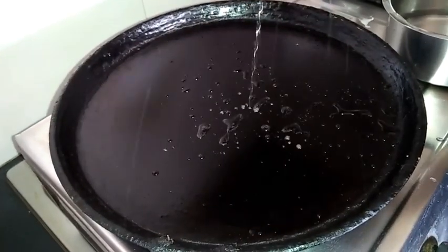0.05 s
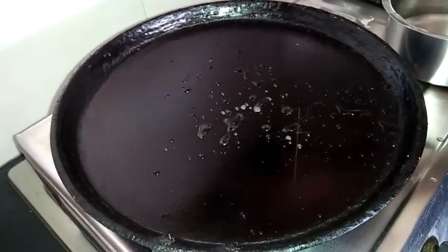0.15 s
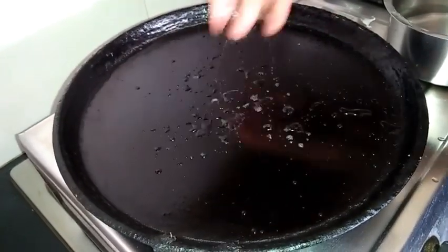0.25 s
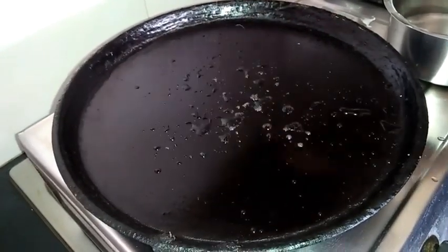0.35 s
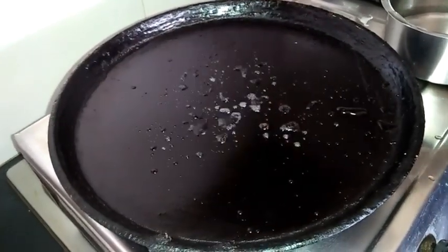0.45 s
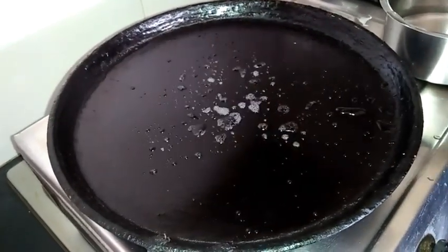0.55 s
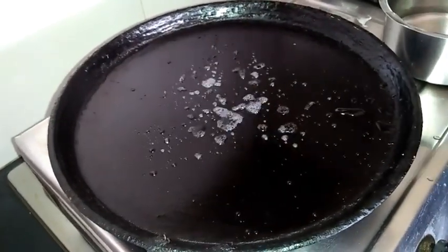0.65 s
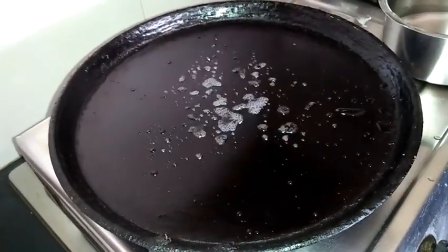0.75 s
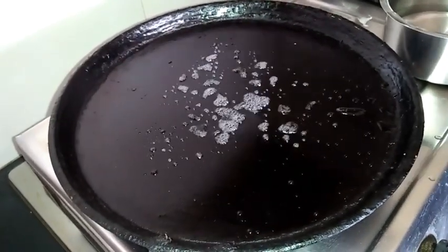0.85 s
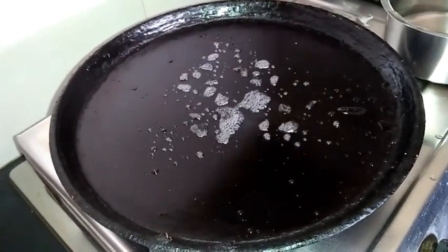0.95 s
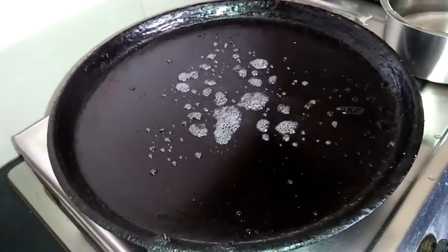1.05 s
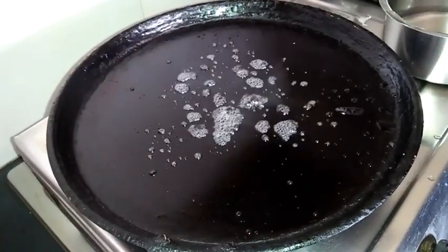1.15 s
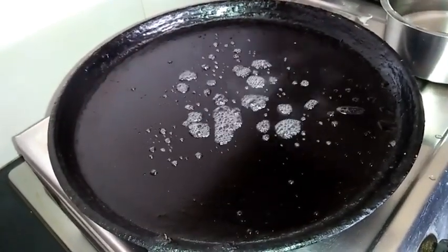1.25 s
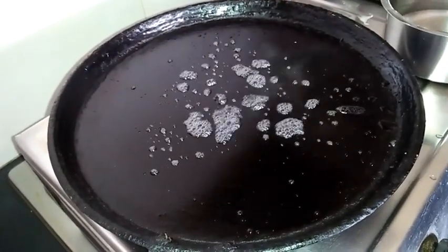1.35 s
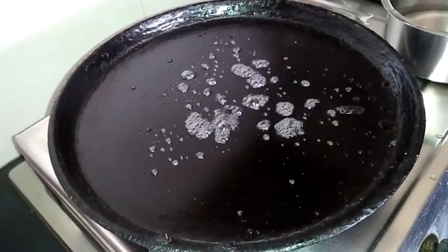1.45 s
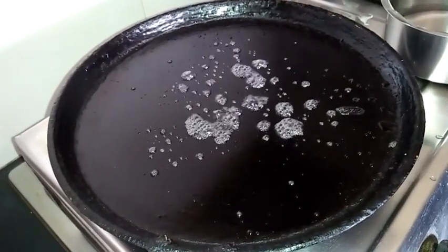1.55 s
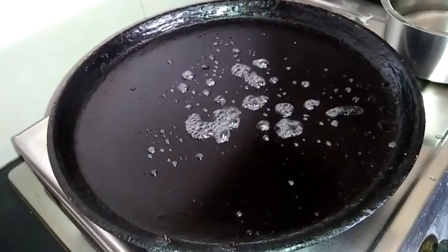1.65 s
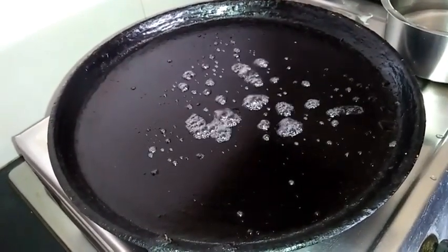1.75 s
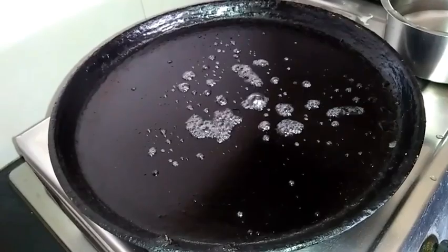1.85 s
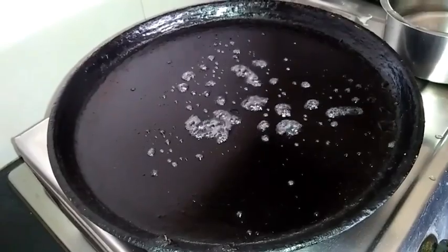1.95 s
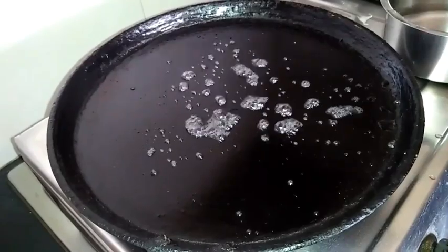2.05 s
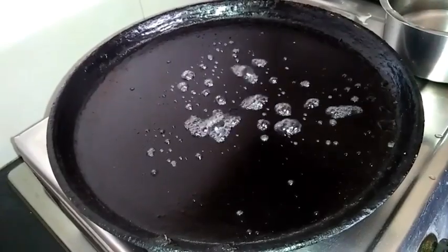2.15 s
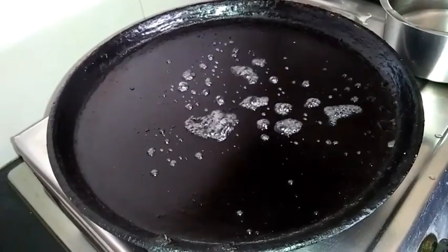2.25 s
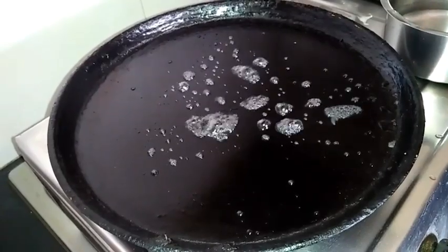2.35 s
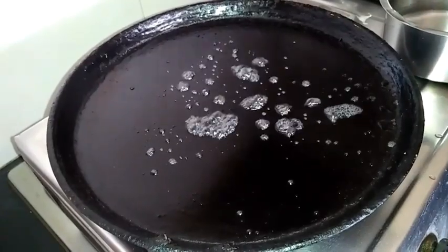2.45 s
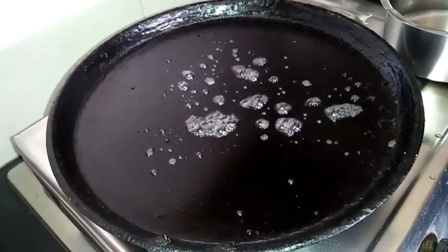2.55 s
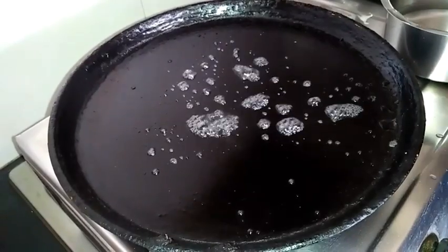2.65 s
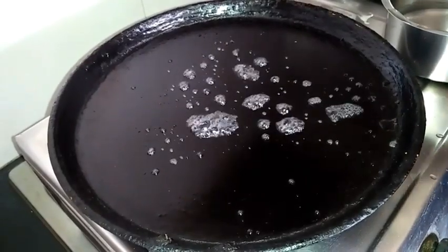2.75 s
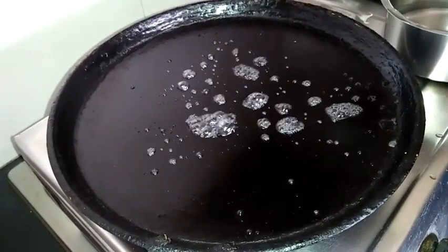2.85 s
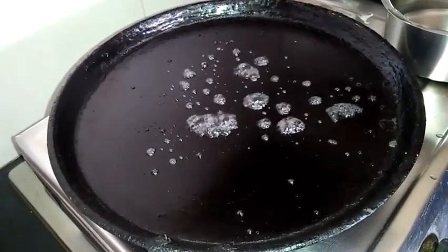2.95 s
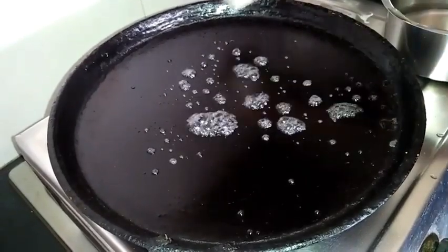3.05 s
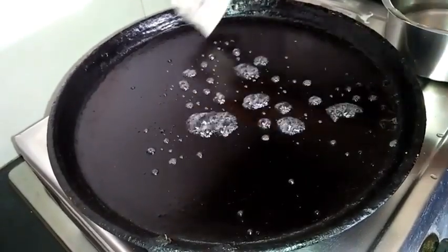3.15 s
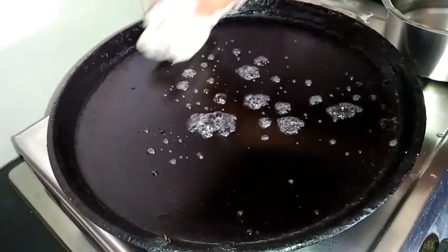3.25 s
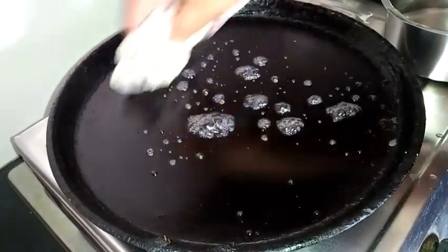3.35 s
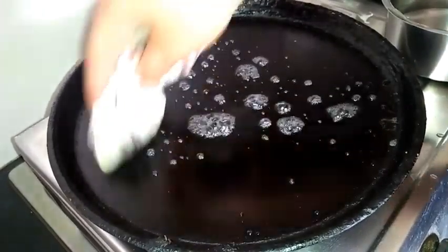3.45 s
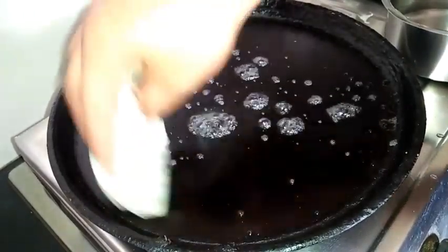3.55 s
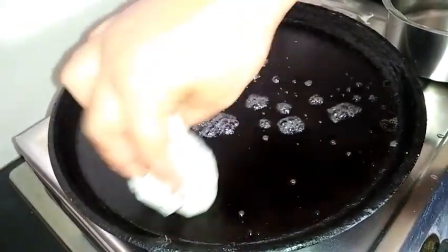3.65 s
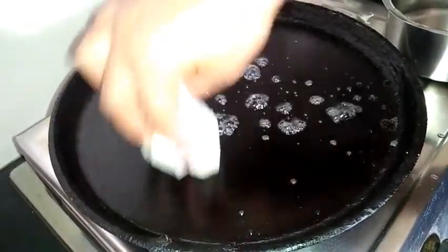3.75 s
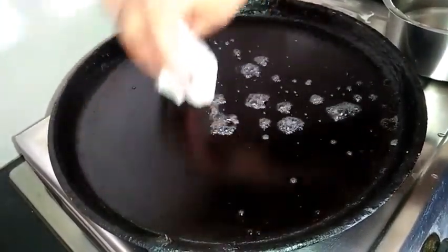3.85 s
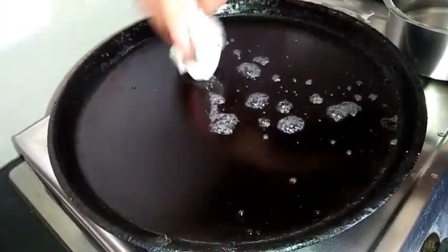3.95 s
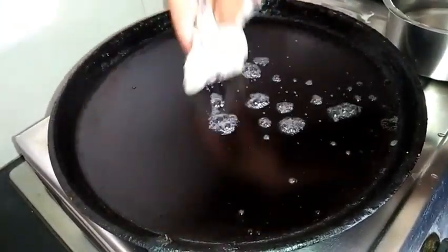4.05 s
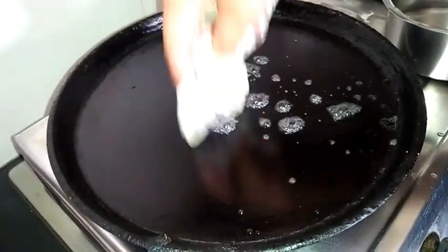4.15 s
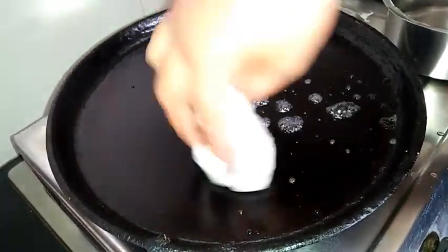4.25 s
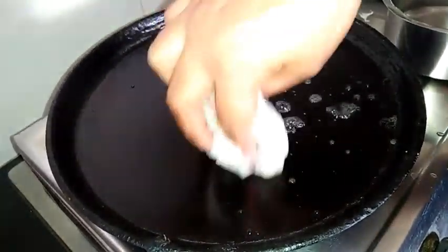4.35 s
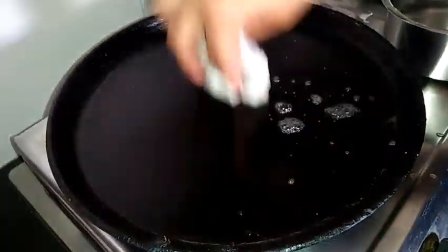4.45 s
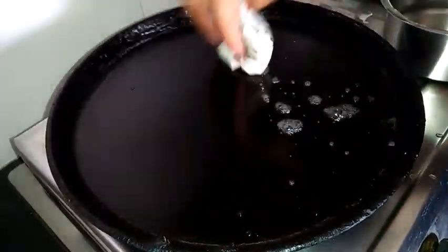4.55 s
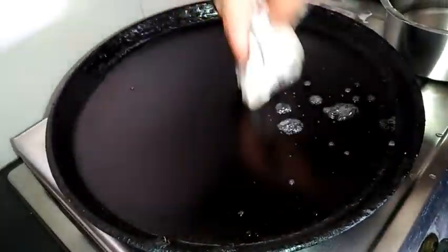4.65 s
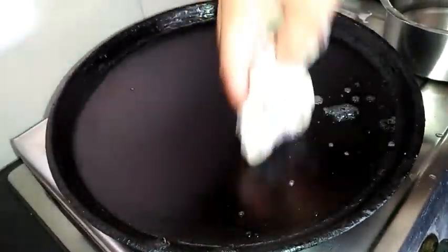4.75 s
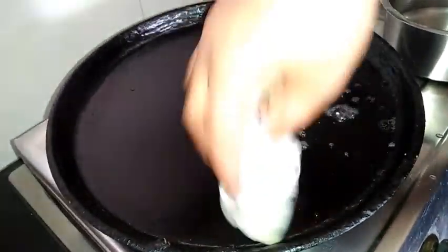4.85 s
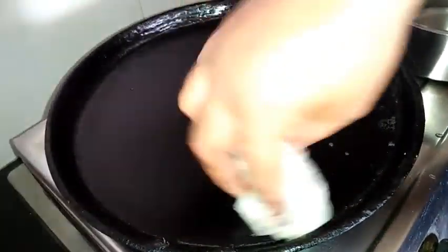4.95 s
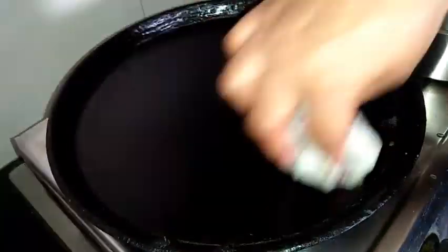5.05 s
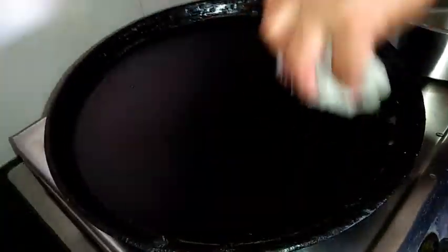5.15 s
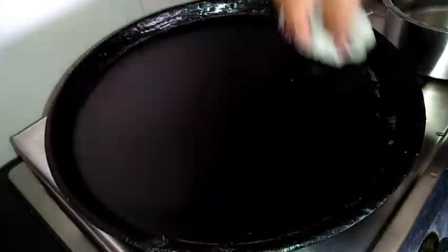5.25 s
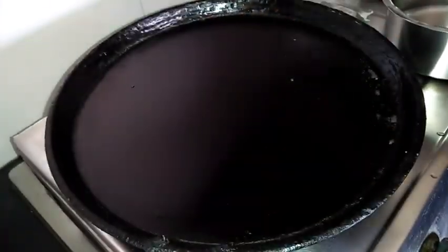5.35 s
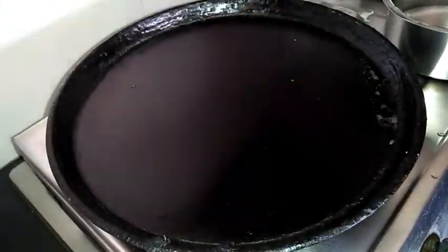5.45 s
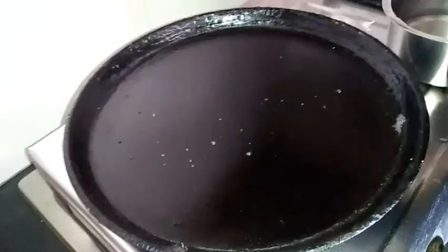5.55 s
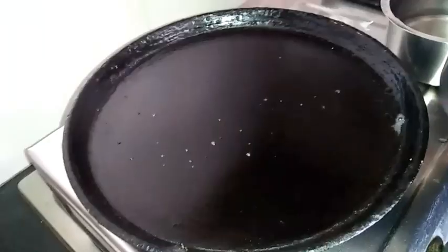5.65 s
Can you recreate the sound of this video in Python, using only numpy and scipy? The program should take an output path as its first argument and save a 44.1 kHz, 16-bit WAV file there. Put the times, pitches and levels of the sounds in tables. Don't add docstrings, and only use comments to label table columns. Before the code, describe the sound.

Bright, grainy sizzle with sharp tiny pops swells over a softly ringing iron plate, with one small metallic ping early on. After a lull, dull damp cloth blows land and the boiling surges into strong hissing bursts, loudest near the end, then stops abruptly. Close microphone, little room, faint flame rumble and hiss below; centred sound with slightly wide treble.

```python
import sys
import numpy as np
from scipy import signal
from scipy.fft import rfft, irfft
from scipy.io import wavfile
from scipy.ndimage import uniform_filter1d

SR = 44100
rng = np.random.default_rng(int(sys.argv[2]) if len(sys.argv) > 2 else 0)


def generate_wav(sig):
    pcm = np.round(np.clip(np.atleast_2d(sig).T, -1, 1) * 32767).astype(np.int16)
    wavfile.write(sys.argv[1], SR, pcm)


def gain_from_db(level_db):
    decades = np.asarray(level_db, float) / 20
    return 10 ** decades


N = 251186
TIME = np.arange(N) / SR

# frequency in Hz, density in dB per Hz.
IRON_SPECTRUM = [(260, -50.5), (450, -26.5), (647, -16.5), (720, -9), (930, -1), (1620, -0.5), (2060, 2),
                 (3310, -4), (3620, -3), (4390, -4), (5000, -8), (6500, -62.5), (11000, -120)]
# frequency in Hz, level in dB, t60 in seconds.
PLATE_MODES = [(560, -0.5, 0.33), (664.3, 3, 0.55), (630, -5, 0.353), (903, -8.5, 0.8), (957, -2, 0.31),
               (1025, -3, 0.28), (1121, 0.5, 0.16), (1255, 2, 0.31), (1534, -6.5, 0.26), (1702, -5, 0.3),
               (1802, 3, 0.28), (2030, -10.5, 0.18), (2137, 2.5, 0.3), (2390, 3.5, 0.06), (2600, -23, .15),
               (3040, 2, 0.34)]
# frequency in Hz, level in dB, t60 in seconds.
POT_MODES = [
    [(2110, 0, .16), (2160, -9, .1), (1710, -9, .12), (1120, -20, .15), (3020, -10, .3), (3348, -11, .15),
     (4300, -11, .1), (2400, -14, .1), (960, -12, .12)],
    [(1696, 2, .58), (1260, -16, .4), (3898, -28, .12), (3030, -24, .2)],
]


def unit(x):
    return x / np.sqrt(np.mean(x ** 2))


def colour(x, points):
    hz, db = np.transpose(points)
    f = np.maximum(np.fft.rfftfreq(8192, 1 / SR), 1)
    response_db = np.interp(np.log(f), np.log(hz), db, db[0] - 30, db[-1] - 30)
    cepstrum = irfft(np.log(gain_from_db(response_db)))
    cepstrum[1:4096] *= 2
    cepstrum[4097:] = 0
    impulse = irfft(np.exp(rfft(cepstrum)))[:4096]
    return signal.fftconvolve(x, impulse)[:len(x)]


def noise_of(points):
    return unit(colour(rng.standard_normal(N), points))


def walk(rate):
    k = int(SR / rate)
    held = np.repeat(rng.standard_normal(N // k + 1), k)
    return 0.91 * uniform_filter1d(uniform_filter1d(held, k), k)[:N]


def ring(x, modes, stretch=1):
    out = 0
    for hz, db, t60 in modes:
        pole = np.exp(2j * np.pi * hz / SR - np.log(1000) / (t60 * stretch * SR))
        out = out + gain_from_db(db) * signal.lfilter([1], [1, -pole], x).imag
    return out


def boiling():
    # time in seconds, steam in dB, grip on the iron in dB, bead size in dB.
    beads = [(0, -73, -5.5, -9), (.25, -65.5, -7, -6.5), (.55, -61, -9.5, -10.5), (.7, -57.5, -6.5, -11),
             (.88, -53, -8, -7.5), (1.1, -52, -10, -9), (1.28, -50, -8, -8), (1.53, -49, -11.5, -7.5),
             (1.66, -52, -11.5, -6), (1.85, -54.5, -6.5, -10), (1.97, -51.5, -11, -8.5),
             (2.08, -63, -6, -3.5), (2.16, -61.5, -4.5, -10), (2.36, -58, -6.5, -10.5),
             (2.55, -56, -10, -14.5), (2.96, -59, -7.5, -9), (3.05, -57, -9.5, -12.5),
             (3.4, -54, -6.5, -17.5)]
    # time in seconds, steam in dB, grip on the iron in dB, bead size in dB.
    wipes = [
        [(3.44, -51, -8, -16), (3.5, -47.5, -10, -14.5), (3.74, -47, -9.5, -8.5), (3.86, -45, -10, -10),
         (3.9, -44, -4.5, -11.5), (4.02, -38, -8.5, -21), (4.12, -42, -10.5, -37)],
        [(4.16, -38.5, -7, -14), (4.3, -45.5, 0, -4.5), (4.42, -39.5, -2.5, -11), (4.45, -38.5, -5, -11),
         (4.52, -41, -2, -13), (4.6, -44.5, -2.5, -12), (4.7, -40.5, -7.5, -21)],
        [(4.75, -37.5, -9.5, -25), (4.79, -33, -14, -20), (4.9, -33.5, -13, -17), (4.99, -36.5, -11.5, -17),
         (5.07, -46, -3, -14), (5.13, -39, -11.5, -11.5), (5.27, -40, -8, -14.5), (5.35, -46.5, -10.5, -13.5),
         (5.41, -60.5, -12, -13.5)],
    ]
    # time in seconds, level in dB.
    squeezed = [(.3, -9), (1.3, -13.5), (3.3, -17), (3.5, -10), (4.1, -10), (4.55, -6), (4.72, -7.5),
                (4.88, -14), (5.1, -4.5), (5.4, -2.5)]
    # start in seconds, height in dB, rise in seconds, fade in seconds,
    # share in the spray from 0 to 1.
    surges = [(.043, 4, .004, 0.068, .6), (.292, 5.5, .005, 0.14, 1), (.59, 6, 0.0079, 0.035, 1),
              (.727, 3.5, .005, 0.034, 1), (.77, 4, .008, .012, .3), (.968, 4, .008, .015, .5),
              (1.028, 5, .008, .015, 1), (1.16, 4, .008, .015, .7), (1.7, 7, 0.0091, 0.033, .5),
              (1.77, 5, .004, 0.045, .8), (1.87, 4, .004, 0.015, .5), (1.903, 2, .004, 0.03, .5),
              (2.163, 8, 0.0054, 0.069, .4), (2.195, 6.5, .02, 0.046, .6), (2.375, 6, .015, .08, .4),
              (2.43, 4, .01, 0.033, .4), (2.586, 3.5, 0.005, 0.078, .5), (2.7, 3, .012, .03, .6),
              (3.08, 5, .012, 0.088, .4), (4.145, 5.5, .03, .055, 1), (4.32, 6, 0.029, 0.081, 0.2),
              (4.534, 11, 0.002, 0.013, 1), (4.766, 3.5, 0.00395, 0.064, .6), (4.905, 1, .005, .04, .8),
              (5.662, 6, .003, .015, .3)]
    # small bubbles, spray, iron and large bubbles, all in dB.
    again_db = [-68, -75, -70, -79]
    change_s, surge_in_iron = 5.631, 0.17
    dry_db_per_s, iron_dry_db_per_s = -370, -210

    s, *columns = np.transpose(sum(wipes, beads))
    steam, grip, size = (np.interp(TIME, s, c) for c in columns)
    spray = np.interp(TIME, *np.transpose(squeezed))
    dry_s = np.maximum(TIME - s[-1], 0)
    wet = steam + dry_db_per_s * dry_s
    iron = np.maximum(steam + grip + iron_dry_db_per_s * dry_s, -90)
    spray_floor = -72 + dry_db_per_s * dry_s
    fine = 10 * np.log10(gain_from_db(wet + spray) ** 2 + gain_from_db(spray_floor) ** 2)
    levels = np.where(TIME < change_s, [wet, fine, iron, wet + size], np.array(again_db)[:, None])
    for at, db, rise, fade, bright in surges:
        growth = np.clip((TIME - at) / rise, 0, 1)
        flare = db * growth * np.exp(-np.maximum(TIME - at - rise, 0) / fade)
        levels = levels + flare * np.array([[1], [bright], [surge_in_iron], [1]])
    return levels


def bubbles(low_hz, octaves, rate, spread_db, flicker_db, steam_db, cycles, own_db):
    fits = gain_from_db(flicker_db * (walk(30) + walk(110)))
    out = 0
    for hz in low_hz * 2 ** np.arange(0, octaves, 1 / 6):
        size_db = spread_db * np.minimum(rng.exponential(size=N), 3.6)
        burst = (rng.random(N) < rate / SR) * gain_from_db(size_db) * rng.choice([-1, 1], N)
        drive = unit(burst) + gain_from_db(steam_db) * rng.standard_normal(N)
        band = unit(ring(drive, [(hz, 0, cycles / hz)])) * np.sqrt(hz)
        out = out + band * gain_from_db(own_db * (0.59 * walk(9) + 1.15 * walk(38)))
    return fits * out


def fizz(small_db, spray_db, large_db):
    # frequency in Hz, density in dB per Hz.
    large_spectrum = [(2530, -30.5), (4300, -20.5), (5620, -12.5), (7300, -4), (9490, -17.5), (16100, -120)]
    # frequency in Hz, density in dB per Hz.
    small_spectrum = [(4290, -35.5), (7300, -8), (7940, 0.5), (8950, 4.5), (12000, -5.5), (15000, -57),
                      (22000, -120)]
    # frequency in Hz, density in dB per Hz.
    spray_spectrum = [(6760, -31), (11500, -5.5), (12500, 3.5), (13700, 5.5), (14200, 4.5)]
    boil = bubbles(4000, 2, rate=400, spread_db=3.2, flicker_db=.8, steam_db=-.5, cycles=30, own_db=3.4)
    large = unit(colour(boil, large_spectrum)) * gain_from_db(large_db)
    small = unit(colour(boil, small_spectrum)) * gain_from_db(small_db)
    spray = unit(colour(boil, spray_spectrum)) * gain_from_db(spray_db)
    return large + small + spray


def pops():
    # start in seconds, peak in dB, pitch in Hz.
    free = [(.0459, -43, 8360), (.4, -37, 9110), (.5916, -41, 9120), (.6724, -41, 8860), (.7317, -37, 8080),
            (.7779, -36, 7810), (.9046, -42, 7490), (.9725, -39, 9200), (1.033, -32, 9380),
            (1.1031, -36, 8410), (1.1237, -29, 8820), (1.1644, -36, 8550), (1.2061, -36, 9260),
            (1.2895, -40, 9250), (1.3375, -37, 9410), (1.4813, -33, 8640), (1.5052, -32, 8940),
            (1.688, -34, 8560), (1.7057, -35, 8380), (1.7513, -41, 8000), (1.7708, -18, 9000),
            (1.8745, -34, 8480), (1.8872, -38, 10500), (1.907, -34, 9100), (2.1686, -35, 8300),
            (2.2431, -37, 7820), (2.28, -36, 8600), (2.3436, -42, 8990), (2.3887, -39, 8520),
            (2.509, -41, 9600), (2.5749, -44, 8700), (2.5885, -33, 9400), (2.6692, -40, 9180),
            (2.7056, -31.5, 9000), (2.7676, -43, 8660), (3.0855, -39, 8700), (3.0909, -35, 8740),
            (3.1466, -42, 8870), (3.1592, -34, 8730), (3.2143, -39, 9120), (3.244, -37, 9090),
            (3.3053, -29, 8800), (3.4628, -33, 9360), (3.4823, -30, 9090), (3.5664, -32, 10000)]
    # start in
    # seconds, peak in dB, pitch in Hz, share in the iron in dB.
    cracks = [(.2967, -37, 8200, -18), (4.162, -24, 8800, -40), (4.1825, -18, 10400, -35),
              (4.1731, -11, 9200, -34), (4.3249, -27, 8570, -22), (4.3511, -23, 7900, -30),
              (4.5349, -15, 9440, -11.5), (4.7689, -21, 9100, -30), (4.8123, -17, 8750, -30),
              (4.8315, -19, 9000, -35), (4.8588, -21, 8700, -35), (4.9121, -18, 9000, -35),
              (5.6325, -46, 9070, -4), (5.6646, -44, 8540, -18)]
    rows = list(cracks) + [(*p, -30) for p in free]
    bright, snaps, ticks = np.zeros(N + 2000), np.zeros(N + 2000), np.zeros(N)
    t = np.arange(2000) / SR
    ping_swell = (t / 0.00042) ** 2 * np.exp(2 - 2 * t / 0.00044)
    snap_fade = gain_from_db(-8) * np.exp(-t / .0009) + gain_from_db(-14) * np.exp(-t / .006)
    for s, db, hz, iron_db in rows:
        i = int(s * SR)
        bright[i:i + len(t)] += gain_from_db(db - 2.5) * np.sin(2 * np.pi * hz * t) * ping_swell
        snaps[i:i + len(t)] += gain_from_db(db - 3) * rng.standard_normal(2000) * snap_fade
        ticks[i] = gain_from_db(db + iron_db)
    # frequency in Hz, density in dB per Hz.
    snap_spectrum = [(4000, -33), (6000, -26), (8000, 5.5), (10000, -1), (13000, -5), (15000, -23.5)]
    return (bright + colour(snaps, snap_spectrum))[:N] + gain_from_db(19.5) * colour(ticks, IRON_SPECTRUM)


def patches(rows, width, grain_db, trim_db, rise):
    out = np.zeros(N + 12000)
    for s, db, hz, length in rows:
        hiss, grain = rng.standard_normal((2, 12000))
        t = np.arange(12000) / SR / length
        band = signal.butter(2, [hz / (1 + width), hz * (1 + width)], "band", fs=SR, output="sos")
        grains = gain_from_db(grain_db * uniform_filter1d(grain, 40) * np.sqrt(40))
        sound = unit(signal.sosfilt(band, hiss * grains))
        onset = np.sin(np.pi / 2 * np.minimum(t / rise, 1))
        fade = np.cos(np.pi / 2 * np.clip((t - rise) / 1.3, 0, 1))
        i = max(int((s - .65 * length) * SR), 0)
        out[i:i + len(t)] += gain_from_db(db + trim_db) * sound * (onset * fade) ** 2
    return out[:N]


def sputters():
    # middle in seconds, level in dB, pitch in Hz, length in seconds.
    sputter_rows = [(0.048, -65.5, 8230, 0.02), (0.108, -68.0, 8230, 0.04), (0.286, -64.5, 8230, 0.054),
                    (0.404, -60.0, 8730, 0.034), (0.597, -58.5, 9260, 0.032), (0.774, -55.5, 7760, 0.028),
                    (1.053, -51.0, 8230, 0.058), (1.124, -50.0, 9260, 0.034), (1.358, -50.0, 9260, 0.05),
                    (1.446, -50.5, 8730, 0.03), (1.5, -49.0, 8730, 0.054), (1.708, -53.5, 6500, 0.02),
                    (1.772, -39.0, 8730, 0.02), (1.988, -56.5, 9260, 0.078), (2.172, -53.5, 7760, 0.022),
                    (2.214, -53.0, 7760, 0.034), (2.221, -55.0, 10410, 0.024), (2.279, -54.5, 8730, 0.024),
                    (2.395, -54.5, 8730, 0.032), (2.42, -56.0, 9260, 0.078), (2.595, -51.0, 9820, 0.026),
                    (2.707, -53.5, 9260, 0.026), (3.09, -49.0, 8730, 0.026), (3.161, -52.5, 8730, 0.028),
                    (3.47, -51.0, 9260, 0.04), (3.805, -49.0, 8730, 0.036), (4.014, -44.0, 9820, 0.082),
                    (4.045, -43.5, 9260, 0.064), (4.174, -35.0, 8730, 0.026), (4.193, -44.5, 7760, 0.078),
                    (4.199, -42.5, 10410, 0.106), (4.356, -36.0, 7760, 0.024), (4.43, -42.0, 9260, 0.06),
                    (4.538, -35.0, 8730, 0.02), (4.541, -38.0, 11720, 0.022), (4.771, -43.0, 11720, 0.06),
                    (4.812, -35.0, 8730, 0.098), (5.14, -43.0, 8230, 0.036), (5.193, -46.0, 11720, 0.058),
                    (5.215, -45.0, 11050, 0.058), (5.217, -42.0, 8230, 0.05), (5.653, -67.0, 9260, 0.056),
                    (5.675, -68.0, 10410, 0.04)]
    return patches(sputter_rows, width=.075, grain_db=4.0, trim_db=-1.5, rise=.3)


def shaken_iron(iron_db):
    drive = bubbles(456.0, 3.1, rate=300, spread_db=3.5, flicker_db=1.87, steam_db=4.0, cycles=14.2, own_db=2.5)
    shaken = unit(colour(drive, IRON_SPECTRUM)) * gain_from_db(iron_db - 1.5)
    plate = unit(ring(shaken, PLATE_MODES, 0.64)) * shaken.std()
    even_pot = [(hz, 0, t60) for hz, _, t60 in POT_MODES[1]]
    hum = unit(ring(shaken, even_pot, .25)) * shaken.std()
    return shaken + gain_from_db(-8.5) * plate + gain_from_db(-18) * hum


def chatter():
    # middle in seconds, level in dB, pitch in Hz, length in seconds.
    chatter_rows = [(0.213, -72.5, 770, 0.03), (0.335, -76, 600, 0.04), (0.41, -76, 500, 0.05),
                    (0.565, -76, 320, 0.04), (0.62, -78, 320, 0.04), (0.635, -69.5, 1190, 0.06),
                    (0.719, -72.0, 710, 0.058), (0.846, -67.5, 1830, 0.092), (1.115, -74, 570, 0.04),
                    (1.217, -64.5, 2830, 0.088), (1.259, -64.0, 920, 0.072), (1.392, -63.5, 2180, 0.134),
                    (1.416, -61.0, 1540, 0.03), (1.797, -65.5, 1090, 0.034), (1.983, -70.5, 770, 0.08),
                    (2.412, -70.5, 1000, 0.142), (2.44, -71.5, 2180, 0.112), (3.04, -64.5, 2000, 0.03),
                    (3.045, -68.0, 1000, 0.036), (3.375, -66, 2080, 0.03), (3.407, -51.0, 590, 0.03),
                    (3.412, -49.0, 1830, 0.028), (3.421, -48.5, 920, 0.046), (3.475, -55.0, 650, 0.05),
                    (3.52, -60, 2300, 0.03), (3.61, -60.5, 2180, 0.072), (3.911, -54.5, 1540, 0.068),
                    (3.923, -52.5, 2180, 0.1), (4.025, -51.5, 1000, 0.036), (4.199, -52.5, 1300, 0.09),
                    (4.202, -52.0, 2180, 0.076), (4.448, -47.0, 590, 0.036), (4.467, -48.0, 1300, 0.078),
                    (4.469, -46.5, 1830, 0.066), (4.476, -50.0, 1000, 0.092), (4.615, -53, 2100, 0.03),
                    (4.67, -51.5, 590, 0.062), (4.675, -49.5, 1300, 0.056), (4.757, -51.5, 1300, 0.06),
                    (4.94, -49.5, 2000, 0.042), (5.25, -53.5, 1680, 0.048), (5.285, -55.5, 1190, 0.074),
                    (5.42, -72, 1260, 0.05), (5.666, -71.0, 1680, 0.034)]
    return patches(chatter_rows, width=.08, grain_db=1.5, trim_db=.6, rise=.35)


def thumps():
    # start in seconds, peak in dB, ring in seconds, bass in dB.
    landings = [
        (3.039, -49.5, 0.11, -26),
        (3.401, -30, 0.33, -13),
        (3.458, -42, .22, -10),
        (3.512, -50, .15, -6),
        (3.689, -51, 0.089, -48),
        (3.951, -47, 0.2, -8.5),
        (4.43, -37, .1, -12),
        (4.437, -27, 0.45, -18),
        (4.642, -32, 0.62, -20),
        (5.631, -55, 0.048, -7),
    ]
    # frequency in Hz, density in dB per Hz.
    blow_spectrum = [(120, -29.5), (200, -28.5), (380, -8.5), (943, -3), (1360, -8), (2140, -7),
                     (2670, -19), (3650, -18), (4500, -30), (5850, -71), (9900, -120)]
    blow, bass = noise_of(blow_spectrum), noise_of([(90, -5.5), (150, -2.5), (300, 5.0)])
    scuff_db = walk(60)
    out = np.zeros(N)
    for s, db, t60, bass_db in landings:
        t = np.maximum(TIME - s, 0)
        attack = np.minimum(t / .003, 1)
        dull = blow * (np.exp(-t / 0.014) + 0.53 * gain_from_db(-40 * t / t60 + scuff_db))
        bump = gain_from_db(bass_db - 45 * t / t60) * bass
        out += gain_from_db(db - 12) * attack * (dull + bump)
    return out + ring(out * gain_from_db(-55), PLATE_MODES, .45)


def pot():
    # start in seconds, level in dB, side of the pot.
    drops = [
        (.316, -63, 0),
        (.326, -53, 0),
        (.344, -57, 0),
        (.352, -55, 1),
        (5.39, -84, 1),
    ]
    t = np.arange(3000) / SR
    out = 0
    for s, db, side in drops:
        i = int(s * SR)
        grit = rng.standard_normal(3000)
        contact, patter = np.zeros(N), np.zeros(N)
        contact[i:i + len(t)] = grit * np.exp(-((t - .005) / 0.0019) ** 2) / 60
        contact[i + 200] = 1
        patter[i:i + len(t)] = grit * np.exp(-t / 0.03)
        out = out + ring(gain_from_db(db) * contact, POT_MODES[int(side)])
        out = out + gain_from_db(db - 0.5) * colour(patter, IRON_SPECTRUM)
    return out


def stirred(steady_db, column):
    # middle in seconds, half length in seconds, rumble in dB, air on the microphone in dB.
    moves = [(.19, .1, -97, -82), (.65, 0.2, -80, -83), (.95, 0.22, -93, -78), (1.792, 0.068, -80, -75.5),
             (1.966, 0.094, -68.5, -78.5), (2.41, 0.094, -78, -82), (2.667, 0.11, -79, -81),
             (3.3, 0.063, -68, -91), (3.476, 0.1, -63, -64), (4.02, 0.1, -65.5, -72),
             (4.252, 0.11, -71, -80), (4.468, 0.14, -66, -71.5), (4.64, 0.17, -59.5, -73),
             (4.955, 0.3, -78.5, -75.5), (5.317, .08, -77, -76), (5.64, 0.019, -73, -65),
             (5.68, 0.043, -74, -78)]
    power = gain_from_db(steady_db) ** 2
    for row in moves:
        swell = np.cos(np.pi / 2 * np.clip((TIME - row[0]) / row[1], -1, 1)) ** 2
        power = power + gain_from_db(row[column]) ** 2 * swell
    return np.sqrt(power)


def burner():
    # frequency in Hz, density in dB per Hz.
    flame_spectrum = [(65, -41), (110, -17), (119, -7), (156, -6.5), (204, -12.5), (225, -22), (249, -7.5),
                      (319, 0), (392, -14), (433, -5), (600, -5), (780, -29), (1320, -120)]
    hush_db = -5 * np.clip((TIME - 5.42) / 0.052, 0, 1)
    rumble = stirred(-78.5 - 5.0 * np.exp(-TIME / .35) + hush_db, column=2)
    return noise_of(flame_spectrum) * rumble * gain_from_db(2.3 * walk(9.8))


def moving_air():
    # frequency in Hz, density in dB per Hz.
    air_spectrum = [(20, -18), (48, -11), (62, -1), (100, -5.5), (140, -20.5)]
    return noise_of(air_spectrum) * stirred(-91 + 5.4 * walk(12), column=3)


def hiss():
    # frequency in Hz, density in dB per Hz.
    hiss_spectrum = [(290, -45.5), (500, -3.5), (1360, -4.5), (1900, -8.5), (2250, -18), (2980, -31.5),
                     (3790, -19.5), (14400, -32)]
    return noise_of(hiss_spectrum) * gain_from_db(-75.5 - 4.0 * np.exp(-TIME / .35))


def scene():
    small_db, spray_db, iron_db, large_db = boiling()
    steam = fizz(small_db, spray_db, large_db) + pops() + sputters()
    iron = shaken_iron(iron_db) + chatter() + thumps()
    mono = steam + iron + pot() + burner() + moving_air() + hiss()
    return np.array([mono, mono])


def low_pass(x):
    return signal.sosfilt(signal.butter(12, 15540, fs=SR, output="sos"), x)


def record(dry):
    # time in seconds, frequency in Hz.
    wide_from = [(0, 7500), (1, 6500), (1.7, 6000), (1.8, 4300), (4.2, 4300), (4.3, 5500), (5.7, 5000)]
    end_s, top_hz, offset = 5.6955, 14480, -1.45e-4
    f, t, mid = signal.stft(dry[0], SR, "cosine", 2048, 1024)
    band = np.arange(len(f)) // 32
    chance = rng.standard_normal((band[-1] + 1, len(t)))
    patch = uniform_filter1d(uniform_filter1d(chance, 2), 2, axis=0)[band] * 2 > -.7
    edge_hz = np.interp(t, *np.transpose(wide_from)) + 500 * np.abs(chance[0])
    wide = patch * (f[:, None] > edge_hz)
    energy = uniform_filter1d(np.abs(mid) ** 2, 32, axis=0) * gain_from_db(5 * chance[1])
    noise = signal.stft(rng.standard_normal(N), SR, "cosine", 2048, 1024)[2]
    noise = noise / np.sqrt(np.mean(np.abs(noise) ** 2))
    side = gain_from_db(-6.6) * signal.istft(noise * np.sqrt(energy) * wide, SR, "cosine", 2048, 1024)[1][:N]
    strip = uniform_filter1d(rng.standard_normal((len(f) // 9 + 1, len(t))), 3) * np.sqrt(3)
    kept = strip[np.arange(len(f)) // 9] < .6 + (np.log2(f[:, None] / 4500 + .01) / .4) ** 2
    centre = signal.istft(mid * kept, SR, "cosine", 2048, 1024)[1][:N]
    top = signal.ellip(10, .3, 45, top_hz, fs=SR, output="sos")
    stereo = signal.sosfilt(top, centre + np.array([side, -side]))
    return low_pass(stereo * (TIME < end_s) + offset)


dry = scene()
out = record(dry)
generate_wav(out)
```